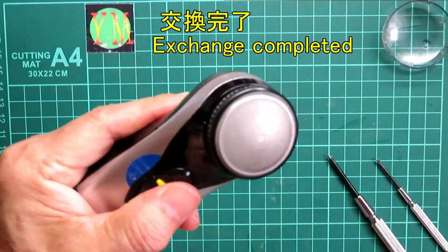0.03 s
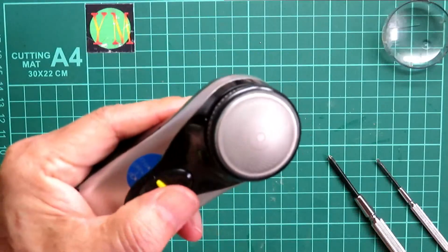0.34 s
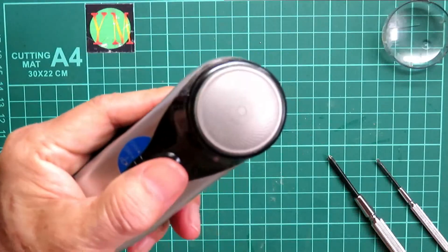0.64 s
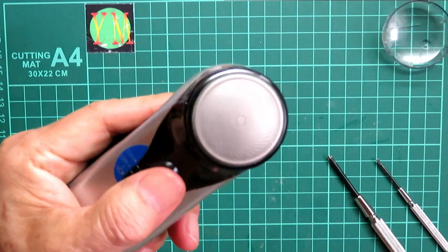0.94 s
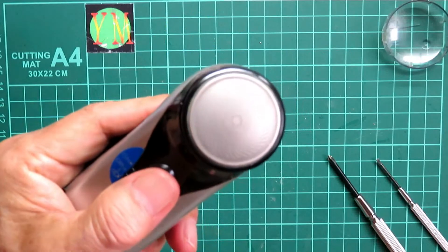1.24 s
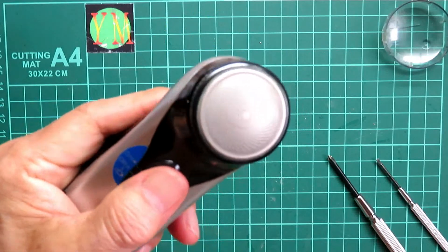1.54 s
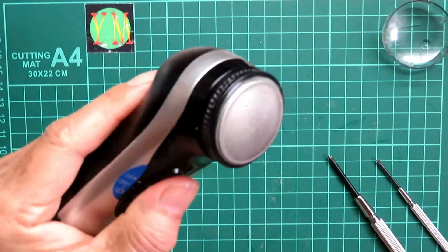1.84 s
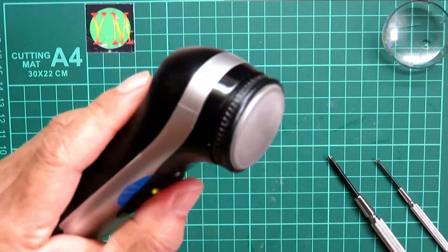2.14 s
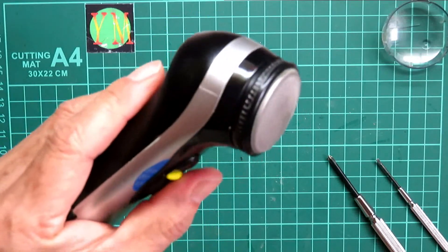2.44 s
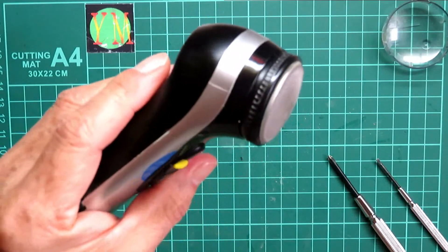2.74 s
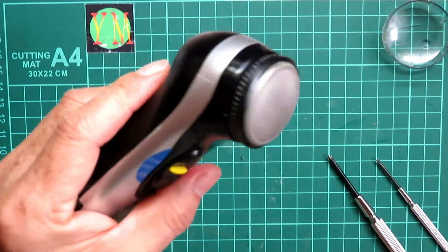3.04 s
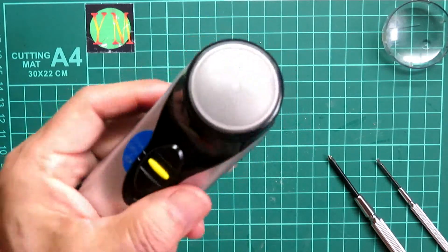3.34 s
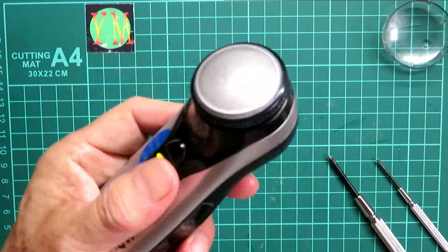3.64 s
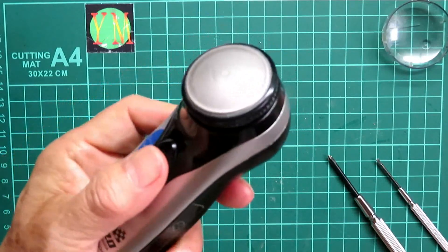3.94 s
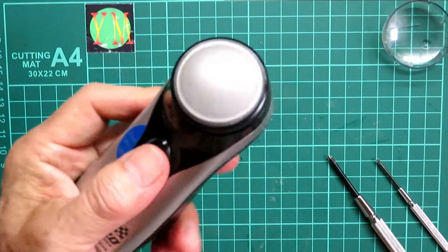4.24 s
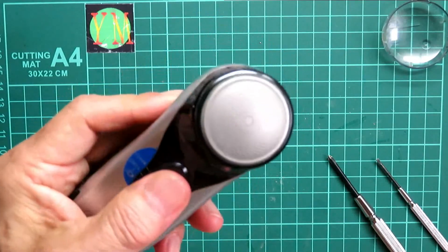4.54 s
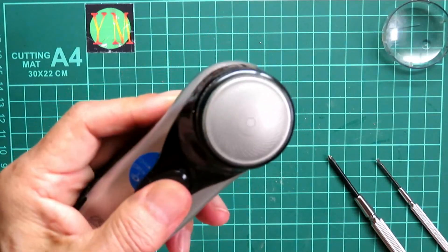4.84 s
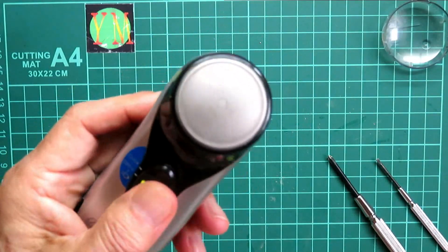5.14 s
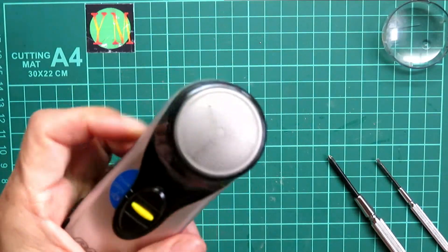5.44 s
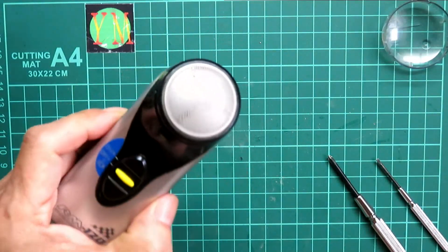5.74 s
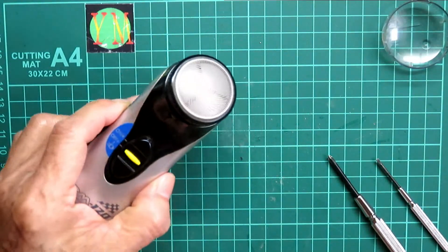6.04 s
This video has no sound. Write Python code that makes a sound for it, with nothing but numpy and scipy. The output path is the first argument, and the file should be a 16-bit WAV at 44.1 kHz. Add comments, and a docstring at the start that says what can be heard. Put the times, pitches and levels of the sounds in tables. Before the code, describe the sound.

The raspy, whining buzz of a handheld electric shaver cuts off and coasts to a halt, leaving faint finger taps in a quiet room.

```python
"""A small rotary shaver runs in the hand over a desk. Its loose cutter rattles the plastic housing and
scrapes past the slots of the foil, nearly alike on every turn, so the sound gathers at harmonics of the
rotation rate. The gears sing, blades squeal, and the rasp grows while the hand turns the head aside.
At 4.85 s the power is cut: friction brakes the cutter, the pitch falls, the blades catch, and it halts
with a knock. Afterwards the fingers shift on the case in a quiet room."""
import sys
import numpy as np
from scipy import signal
from scipy.fft import rfft, irfft, next_fast_len
from scipy.io import wavfile
from scipy.ndimage import uniform_filter1d, map_coordinates

SR = 44100
rng = np.random.default_rng(int(sys.argv[2]) if len(sys.argv) > 2 else 0)


def store_pcm(level_fs):
    """Save levels as 16-bit WAV."""
    pcm = np.round(np.clip(level_fs, -1, 1) * 32767).astype(np.int16)
    wavfile.write(sys.argv[1], SR, np.atleast_2d(pcm).T)


N = 276989
TIME = np.arange(N) / SR
OFF_S, HALT_S = 4.848, 5.312  # the power is cut; the cutter stands still
COAST_FADE_S = .13  # after the cut, the gear tones die and the foil's ring drops over this time
SLOTS, STEPS = 40, 2048  # per turn: slots passed, samples of a roughness pattern

# Levels are relative. Harmonic numbers are multiples of the rotation rate.
# rotation rate of the cutter under power: t/s, f/Hz
ROTATION = [(0.0, 62.07), (0.36, 65.21), (0.54, 67.12), (0.83, 66.39), (0.97, 68.69), (1.3, 71.58),
            (1.49, 70.96), (1.58, 73.1), (2.28, 74.28), (2.43, 72.61), (2.5, 71.05), (2.72, 70.43),
            (2.79, 72.69), (3.1, 74.63), (3.48, 75.24), (3.51, 75.79), (4.16, 77.7), (4.21, 75.75),
            (4.31, 73.05), (4.84, 71.12)]
# the hand turns the head aside: t/s, tilt (0 face on, 1 side on)
HEAD_TILT = [(0, 0.015), (1.5, 0.2), (1.85, 1), (2.35, 1), (2.6, 0.9), (3.4, 0.8), (3.65, 0.14),
             (4.15, 0.15), (4.35, 0.19)]
# how hard the cutter shakes the housing: t/s, head level/dB, shell level/dB
HOUSING_SHAKE = [(0.0, -26.5, -22), (0.03, -21, -25.5), (0.13, -18, -24.5), (0.88, -17.5, -21.5),
                 (1.09, -19.5, -18.5), (2.0, -16.5, -21), (2.63, -22.5, -21.5), (2.9, -14.5, -17),
                 (2.93, -20.5, -23), (3.01, -18.5, -22), (3.61, -16.5, -17), (3.73, -19.5, -19.5),
                 (4.3, -21.5, -19), (4.39, -16.5, -20), (4.7, -26.5, -18), (4.85, -26, -18.5)]
# boom of the cavity, and buzz of the flank where the hand leaves it bare: t/s, level/dB
CAVITY_LEVEL = [(0.0, -38), (0.55, -29.5), (0.58, -31.5), (1.21, -28), (3.08, -30.5), (3.69, -24.5),
                (3.86, -28), (4.42, -28.5), (4.55, -32.5), (4.85, -33.5)]
FLANK_LEVEL = [(1.6, -49), (1.9, -33), (2.6, -28), (3, -30), (3.3, -53), (4.25, -43), (4.65, -30.5),
               (4.86, -31)]
# frequency responses of the four parts of the housing: f/Hz, level/dB
CAVITY_RESPONSE = [(200, -32.5), (380, -22.5), (450, -15), (540, -23), (610, -21.5), (670, -7.5),
                   (780, -0.5), (880, 5.5), (960, 4), (1030, -3.5), (1120, -5), (1400, -21.5), (2000, -28)]
HEAD_RESPONSE = [(1000, -58), (1350, -17), (1500, -17), (1620, -2.5), (1720, 2), (1800, -1), (1920, -4),
                 (2080, -7), (2400, -31.5), (3500, -34)]
SHELL_RESPONSE = [(1600, -50.5), (2100, -18), (2280, 0), (2450, 0), (2650, 2.5), (2900, -1), (3100, -8.5),
                  (3400, -8.5), (3900, -10.5), (4600, -12), (7000, -15)]
FLANK_RESPONSE = [(400, -31), (610, -11.5), (900, -8.5), (1100, 0.5), (1300, -4.5), (1470, 3.5),
                  (1680, -17.5), (2000, 3.5), (2300, -9), (4000, -46.5)]
# spectral envelopes of the foil's rasp, sizzle, squeals and catches: f/Hz, level/dB
RASP_RESPONSE = [(500, -47), (2000, -16), (3200, -3), (3750, .5), (4450, -9), (5000, -3), (5500, 0),
                 (7000, -5), (9000, -20), (15800, -29)]
SIZZLE_RESPONSE = [(500, -40), (3000, -22), (4500, -3.5), (5600, 4.5), (7000, 1.5), (8400, 2), (9400, 5.5),
                   (10500, 2), (11500, 1.5), (12500, 1), (14000, -0.5), (15800, -2)]
SQUEAL_RESPONSE = [(500, -37), (1300, -16), (1750, 0), (2300, -1), (3300, -8), (4500, 2), (5800, 6),
                   (7000, -1.5), (8300, 1), (10500, 0), (12800, 7.5), (14800, 3), (16000, -14)]
CATCH_RESPONSE = [(500, -30), (3000, -12), (4500, 2.5), (6500, 4.5), (8800, 8), (11000, 0), (14000, -4.5),
                  (15800, -8)]
# three resonances of the foil, shifting as the hand turns the head: t/s, f/Hz, level/dB
FOIL_LOW_MODE = [(0.0, 4900, -24), (0.24, 5600, -29), (0.53, 5420, -26.5), (1.58, 5540, -32.5),
                 (1.84, 5760, -28.5), (2.7, 5580, -25), (3.15, 5850, -30.5), (3.34, 5630, -27),
                 (3.67, 5740, -37), (3.94, 5730, -31), (4.75, 5160, -33.5), (4.85, 5280, -30)]
FOIL_MID_MODE = [(0.0, 8460, -30), (0.22, 8000, -21), (0.35, 8400, -28), (0.67, 8200, -24),
                 (1.57, 9060, -26.5), (1.81, 8550, -40), (2.26, 8960, -31), (2.59, 8360, -25),
                 (3.07, 8780, -23.5), (3.27, 9400, -31), (3.39, 8800, -36), (3.84, 9630, -28),
                 (4.27, 8930, -25.5), (4.85, 8300, -29)]
FOIL_TOP_MODE = [(0.0, 14000, -26), (0.16, 13100, -27), (0.92, 13600, -29.5), (0.96, 13700, -24),
                 (1.08, 13800, -27), (1.62, 13960, -28), (2.21, 13800, -37), (3.48, 14300, -30),
                 (3.61, 13500, -32), (3.89, 13200, -27), (4.21, 13200, -28), (4.28, 14400, -27),
                 (4.78, 13950, -26), (4.85, 13960, -23)]
# the foil's share in the stereo side signal: f/Hz, level/dB
SIDE_RESPONSE = [(700, 11), (1400, -30), (2600, -52), (4200, -35), (5200, -8), (6800, -24), (8100, -5),
                 (12000, 0.5), (15000, -4.5)]
# brief squeals of a blade: start t/s, end t/s, centre harmonic, width/harmonics, level/dB
BLADE_SQUEALS = [(0.099, 0.42, 126, 5, -34), (0.15, 0.913, 121, 2, -27.5), (.1, 0.94, 156, 8, -35),
                 (0.417, 0.97, 81, 1, -37), (0.851, 1.06, 124, 5, -30), (0.86, 1.4, 157, 10, -40),
                 (1.0, 1.55, 77, 5, -38), (0.96, 1, 202, 8, -31), (1.02, 1.54, 129, 2, -33.5),
                 (1.682, 2.2, 82, 2, -35), (2.25, 3, 157, 14, -34), (2.594, 3, 120, 4, -33),
                 (3.1, 3.2, 162, 6, -34), (3.03, 3.6, 82, 1, -40), (3.0, 3.45, 79, 3, -34),
                 (3.5, 4.2, 79, 2, -37.5), (3.401, 4.6, 61, 1, -43), (3.8, 4, 57, 1, -39.5),
                 (3.65, 4.25, 159, 8, -39), (3.6, 4.25, 171, 12, -38), (3.7, 4.9, 113, 6, -37),
                 (4.232, 4.5, 120, 5, -33), (4.96, 5.05, 120, 8, -33), (5.238, 5.28, 245, 10, -25)]
# lasting tones of the gears: harmonic, level/dB
GEAR_HARMONICS = [(9, -45), (10, -46), (11, -47.5), (12, -40), (15, -46), (23, -36.5), (24, -41), (26, -47),
                  (36, -38.5), (40, -40)]
# gear tones that swell as the grip shifts: start t/s, end t/s, harmonic, level/dB
GEAR_SWELLS = [(0, 0.797, 14, -35.5), (0.096, 0.9, 26, -24), (0.706, 1.045, 28, -23),
               (1.155, 2.343, 11, -38), (1.152, 2, 23, -28.5), (1.15, 1.552, 40, -37),
               (1.2, 2.447, 36, -32), (1.852, 2.375, 22, -27), (2.954, 3.435, 22, -24.5),
               (3.001, 3.506, 32, -33.5), (3.2, 3.888, 10, -35), (3.299, 4.553, 23, -26.5),
               (3.3, 4.45, 11, -40.5), (3.7, 4.35, 37, -33.5), (3.397, 4.2, 6, -56), (3.904, 4.94, 9, -41),
               (4.25, 4.792, 40, -31.5), (4.251, 4.6, 38, -28)]
# the cutter strikes the head, catches on the foil, and gives a last knock: t/s, level/dB
HEAD_STRIKES = [(0.622, -13), (1.327, -14), (1.674, -9), (1.702, -6), (1.799, -7), (1.84, -12),
                (1.854, -15), (1.88, -16), (3.019, -7), (3.034, -4), (3.102, -11), (3.406, -15),
                (3.459, -4), (3.589, -12), (4.364, -9), (4.392, -5.5), (4.406, -11.5), (4.435, -7),
                (4.943, -23), (5.065, -27.5), (5.14, -20), (5.154, -21), (5.181, -20.5)]
BLADE_CATCHES = [(5.0673, -8), (5.0994, -5.5), (5.127, -9), (5.1424, -16), (5.1665, -6), (5.1824, -20),
                 (5.2229, -10), (5.254, -6)]
LAST_KNOCK = [(5.302, -27)]
# fingers on the case: t/s, push level/dB, snap level/dB
FINGER_TOUCHES = [(5.8255, -36, -27), (5.8305, -28.5, -31), (6.012, -35.5, -52), (6.025, -45, -55),
                  (6.059, -41, -55)]
# modes rung by a strike, the last knock, a finger's push and its snap: f/Hz, level/dB, T60/s
STRIKE_MODES = [(1705, 0, 0.031), (1800, -12, 0.018), (2670, -16, 0.018)]
LAST_KNOCK_MODES = [(906, 5.5, 0.044), (949, -19, 0.05), (1720, -2, 0.067), (2260, -4, 0.024)]
PUSH_MODES = [(112.6, 2.5, 0.22), (276, -1.5, 0.091), (325, 3, 0.058), (406, -5, 0.067)]
PLASTIC_MODES = [(1130, 1, .012), (1490, -1, 0.011), (6500, -8, .008), (9200, -8, .009), (13800, -14, .008)]
# spectral density of the room noise: f/Hz, level/dB
ROOM_SPECTRUM = [(10, -28), (24, -9), (32, -8.5), (42, -4), (52, -3.5), (62, -9.5), (90, -10), (125, -12),
                 (200, -16), (400, -17), (630, -20), (2700, -27), (7300, -37), (15500, -51)]
# likeness of the room noise in left and right: f/Hz, correlation
ROOM_CORRELATION = [(60, 1), (130, 0.89), (290, 0.01), (1400, 0.44), (15000, 0.32)]


def cutter_speed(judder=.04):
    """Uniform deceleration: the motor holds the rate (Hz) until friction brakes it, with a judder."""
    remaining = np.clip((HALT_S - TIME) / (HALT_S - OFF_S), 0, 1)
    unevenness = 1 + judder * np.sqrt(1 - remaining) * wander(N, size=120)
    return curves(ROTATION)[0] * remaining * unevenness


def rattle(turns, spread_db=.5, jitter_turns=.14, contact_s=.0012):
    """Impact excitation: the loose cutter knocks twice a turn, unevenly, each a decaying noise burst."""
    beats = np.arange(1, int(turns[-1] * 2)) / 2
    late, weak = rng.standard_normal((len(beats), 2)).T
    knocks = impulses(np.interp(beats + jitter_turns * late, turns, TIME), -spread_db * np.tanh(weak))
    envelope = signal.lfilter([1], [1, -np.exp(-1 / (contact_s * SR))], knocks)
    return envelope * rng.standard_normal(N)


def housing(turns, knocks, slack_db=-4, slack_s=.058, coast_db_per_s=-24):
    """Forced vibration: gear buzz, knocks and loose grit drive the cavity, head, shell and flank."""
    buzz = steady(spin(roughness(turns, drift_rad=.16, uneven_db=5.5), turns))
    grit = unit(rng.standard_normal(N) * (1 + .36 * np.cos(2 * np.pi * turns)))
    head_db, shell_db = curves(HOUSING_SHAKE)
    cavity_db, flank_db = curves(CAVITY_LEVEL)[0], curves(FLANK_LEVEL)[0]
    cavity = amp(cavity_db - 1.37) * steady(colour(buzz + .89 * knocks + .5 * grit, CAVITY_RESPONSE))
    head = amp(head_db - 1) * steady(colour(buzz + 1.04 * knocks + .71 * grit, HEAD_RESPONSE))
    shell = amp(shell_db - 2.02) * steady(colour(buzz + .65 * knocks + .68 * grit, SHELL_RESPONSE))
    flank = amp(flank_db) * steady(colour(buzz + .5 * knocks + .5 * grit, FLANK_RESPONSE))
    # without power the gears go slack at once, then fade
    coast_s = np.maximum(TIME - OFF_S, 0)
    slack = amp(slack_db * np.minimum(coast_s / slack_s, 1) + coast_db_per_s * coast_s)
    moving = np.clip((HALT_S - TIME) / .0067, 0, 1)
    return moving * slack * (cavity + head + shell + flank)


def foil(turns, speed, knocks, ring_db, squeal_db, stall_hz=7.4):
    """Friction excitation: blades scrape the slotted foil; the rasp radiates from the head's side."""
    tilt, = curves(HEAD_TILT)
    coasting = np.clip((TIME - OFF_S) / COAST_FADE_S, 0, 1)
    scrape = steady(spin(roughness(turns, drift_rad=.4, uneven_db=5), turns, slot_emphasis))
    hiss = rng.standard_normal(N)
    grain_db = 2 * unit(uniform_filter1d(rng.standard_normal(N), size=30))
    drive = scrape + .33 * unit(hiss * amp(grain_db))
    chatter = .7 * tilt * knocks
    rasp = amp(-35 + 7 * tilt) * steady(colour(drive + chatter, RASP_RESPONSE))
    sizzle = amp(-28 + 4.5 * tilt) * steady(colour(drive, SIZZLE_RESPONSE))
    rings = (amp(-3) * foil_resonance(drive + chatter, FOIL_LOW_MODE, width_hz=1000)
             + amp(-3) * foil_resonance(drive, FOIL_MID_MODE, width_hz=1100)
             + amp(-2) * foil_resonance(drive, FOIL_TOP_MODE, width_hz=1700))
    scraping = beamed(rasp + sizzle + amp(ring_db - 9 * coasting) * rings)
    radiated = scraping + amp(squeal_db) * squeals(turns) + run_down(turns, speed)
    pressure = 1 + .071 * np.cos(8 * np.pi * turns)  # the blades press unevenly around the circle
    return radiated * pressure * (1 - np.exp(-speed / stall_hz))


def blade_emphasis(harmonic, depth_db=4.5):
    """Rotational symmetry: the blades favour every third harmonic."""
    return amp(depth_db * np.cos(2 * np.pi * (harmonic - 1) / 3))


def slot_emphasis(harmonic, depth_db=1):
    """Spatial periodicity: the slots favour multiples of their number, on top of the blades' emphasis."""
    return amp(depth_db * np.cos(2 * np.pi * harmonic / SLOTS)) * blade_emphasis(harmonic)


def foil_resonance(drive, mode, width_hz):
    """Resonance: a mode of the foil selects a steep-sided band around its moving centre frequency."""
    hz, db = curves(mode)
    carrier = np.exp(2j * np.pi * np.cumsum(hz) / SR)
    pole = np.exp(-np.pi * width_hz / SR)
    baseband = signal.lfilter([(1 - pole) ** 2], [1, -2 * pole, pole ** 2], drive / carrier)
    return amp(db) * steady((carrier * baseband).real)


def beamed(x, depth_db=5.2):
    """Directivity: the metal head beams narrow bands past the microphone, at random as the hand moves."""
    spectra = signal.stft(x, nperseg=512, noverlap=384)[2]
    beams = unit(uniform_filter1d(wander(spectra.T.shape, size=120), size=2, axis=1)).T
    gain = amp(depth_db * np.clip(beams - .15, -2.5, 1.3))
    return signal.istft(spectra * gain, nperseg=512, noverlap=384)[1][:N]


def squeals(turns, drift_rad=.0048):
    """Friction-induced vibration: a blade squeals on the slots; phase drift roughens higher squeals."""
    clusters = sum(amp(db) * flare(turns, start, end, centre, width, drift_rad * centre, neighbours=9)
                   for start, end, centre, width, db in BLADE_SQUEALS)
    return colour(clusters, SQUEAL_RESPONSE)


def gears(turns, speed, drift_rad=.0005, flutter_db=4, db_per_hz=.4, usual_hz=72.8):
    """Modulated meshing tones: cutter wobble flutters them; play in the teeth roughens the higher ones."""
    tones = sum(amp(db) * cluster(turns, k, 1, drift_rad * k ** 2) for k, db in GEAR_HARMONICS)
    swells = sum(amp(db + 2) * flare(turns, start, end, k, 1, drift_rad * k ** 2)
                 for start, end, k, db in GEAR_SWELLS)
    powered = np.clip(1 - (TIME - OFF_S) / COAST_FADE_S, 0, 1)
    level_db = db_per_hz * (speed - usual_hz) + flutter_db * np.tanh(wander(N, size=700))
    return (tones + swells) * powered * amp(level_db)


def run_down(turns, speed, level_db=-33, flicker_db=4, rough_rad=.8, low_hz=3300, top_hz=15000):
    """Slot-passing frequency: as the cutter coasts, its overtones fall through the foil's range."""
    coasting, out = (TIME > OFF_S) & (TIME < HALT_S), np.zeros(N)
    for harmonic in SLOTS * np.arange(2, 18):
        hz = harmonic * speed[coasting]
        in_band = np.clip(np.minimum(hz - low_hz, top_hz - hz) / 600, 0, 1)
        gain = in_band * amp(level_db + flicker_db * np.tanh(wander(len(hz), size=700)))
        phase = 2 * np.pi * harmonic * turns[coasting] + rough_rad * wander(len(hz), size=120)
        out[coasting] += gain * np.cos(phase)
    return out


def clacks(cut_hz=1300):
    """Free vibration: the cutter strikes the head, too small to radiate bass, and stops with a knock."""
    highpass = signal.butter(4, cut_hz, "high", fs=SR, output="sos")
    strikes = signal.sosfilt(highpass, ring(impulses(*np.transpose(HEAD_STRIKES)), STRIKE_MODES))
    return strikes + ring(impulses(*np.transpose(LAST_KNOCK)), LAST_KNOCK_MODES)


def catches(rise_s=.0047, ring_hz=8600, width_hz=1800):
    """Sliding friction: the slowing blades rasp at each catch, and the foil rings at its own pitch."""
    age = TIME[:SR // 20] / rise_s
    bursts = signal.oaconvolve(impulses(*np.transpose(BLADE_CATCHES)), age * np.exp(1 - age))[:N]
    rasps = amp(-16) * bursts * unit(colour(rng.standard_normal(N), CATCH_RESPONSE))
    resonator = signal.iirpeak(ring_hz, ring_hz / width_hz, fs=SR)
    ringing = unit(signal.lfilter(*resonator, rng.standard_normal(N)))
    return rasps + amp(-31) * gate(5.14, 5.26, fade_s=.15) * ringing


def fingers():
    """Impulse response: each touch rings the case with a dull push and a small plastic snap."""
    times, push_db, snap_db = np.transpose(FINGER_TOUCHES)
    return ring(impulses(times, push_db), PUSH_MODES) + ring(impulses(times, snap_db), PLASTIC_MODES)


def room(noise_db=-39.5, hum_hz=51, hum_db=-49):
    """Partial coherence: rumble alike in both channels and a less alike soft hiss, with a faint hum."""
    hz = np.fft.rfftfreq(N, 1 / SR)
    left, independent = rfft(rng.standard_normal((2, N)))
    correlation = at_frequency(ROOM_CORRELATION, hz)
    right = correlation * left + np.sqrt(1 - correlation ** 2) * independent
    air = irfft(np.array([left, right]) * amp(at_frequency(ROOM_SPECTRUM, hz)), N)
    return amp(noise_db) * unit(air) + amp(hum_db) * np.sin(2 * np.pi * hum_hz * TIME)


def roughness(turns, drift_rad, uneven_db):
    """Quasi-periodicity: the roughness around the circle recurs, its harmonics drifting turn by turn."""
    shape = (int(turns[-1]) + 2, STEPS // 2 + 1)
    phase = drifting_phase(shape, drift_rad)
    strength = np.tanh(wander(shape, size=30))
    return irfft(amp(uneven_db * strength) * np.exp(1j * phase), axis=1).ravel()


def spin(pattern, turns, weight=np.ones_like):
    """Pitch follows rotation: the pattern, its harmonics weighted, is read at the cutter's angle."""
    size = next_fast_len(len(pattern))
    shaped = irfft(rfft(pattern, size) * weight(np.fft.rfftfreq(size, 1 / STEPS)), size)
    fine_turns = np.interp(np.arange(3 * N) / 3, np.arange(N), turns)  # oversampled against aliasing
    return signal.resample_poly(map_coordinates(shaped, [fine_turns * STEPS], order=1), 1, 3)


def cluster(turns, centre, width, drift_rad, neighbours=0, trade_db=5):
    """Fourier synthesis: a harmonic and its neighbours trade strength under a bell curve, at rms 1."""
    offsets = np.arange(-neighbours, neighbours + 1)
    harmonics = round(centre) + offsets
    shape = (int(turns[-1]) + 3, len(harmonics))
    bell = 1 / (1 + (2 * offsets / width) ** 2)
    weights = bell * blade_emphasis(harmonics) * amp(trade_db * wander(shape, size=14))
    weights /= np.linalg.norm(weights, axis=1, keepdims=True)
    spectra = np.zeros((shape[0], STEPS // 2 + 1), complex)
    spectra[:, harmonics] = weights * np.exp(1j * drifting_phase(shape, drift_rad))
    cycles, blend = irfft(spectra, axis=1), np.arange(STEPS) / STEPS
    pattern = (cycles[:-1] * (1 - blend) + cycles[1:] * blend).ravel()  # each turn fades into the next
    return unit(np.interp(turns * STEPS, np.arange(len(pattern)), pattern))


def flare(turns, start, end, centre, width, drift_rad, neighbours=0):
    """Amplitude envelope: a cluster of harmonics sounds for a limited time."""
    envelope = gate(start, end, fade_s=min(.11, (end - start) / 3))
    on, out = envelope > 0, np.zeros(N)
    out[on] = envelope[on] * cluster(turns[on] - turns[on][0], centre, width, drift_rad, neighbours)
    return out


def drifting_phase(shape, drift_rad):
    """Random walk: each harmonic (column) takes one phase step per turn (row)."""
    return 2 * np.pi * rng.random(shape[1]) + drift_rad * np.cumsum(rng.standard_normal(shape), 0)


def wander(shape, size):
    """Low-pass noise: random values of rms 1 that change over size rows."""
    smoothed = uniform_filter1d(rng.standard_normal(shape), size, 0, mode="wrap")
    return unit(uniform_filter1d(smoothed, size, 0, mode="wrap"))


def ring(x, modes):
    """Modal superposition: every impulse starts a sum of damped sinusoids."""
    t = TIME[:SR // 4]
    response = sum(amp(db - 60 * t / t60) * np.sin(2 * np.pi * hz * t) for hz, db, t60 in modes)
    return signal.oaconvolve(x, response)[:N]


def colour(x, response, size=8192):
    """Minimum-phase filtering: a causal filter with the given magnitude response."""
    log_gain = np.log(amp(at_frequency(response, abs(np.fft.fftfreq(size, 1 / SR)))))
    taps = np.fft.ifft(np.exp(np.conj(signal.hilbert(log_gain)))).real[:size // 2]
    return signal.oaconvolve(x, taps)[:N]


def impulses(times, db):
    """Ideal impacts: one sample at each given time."""
    return np.bincount(np.round(times * SR).astype(int), amp(db), N)[:N]


def gate(start, end, fade_s):
    """Trapezoidal window: linear fades centred on start and end."""
    return np.clip(np.minimum(TIME - start, end - TIME) / fade_s + .5, 0, 1)


def curves(rows):
    """Linear interpolation of a table's columns over time."""
    times, *columns = np.transpose(rows)
    return [np.interp(TIME, times, column) for column in columns]


def at_frequency(points, hz):
    """Interpolation of a spectrum on a logarithmic frequency axis."""
    f, value = np.transpose(points)
    return np.interp(np.log(hz + 1), np.log(f + 1), value)


def steady(x, size=6000):
    """Normalisation of the running rms to 1."""
    return x / np.sqrt(abs(uniform_filter1d(x ** 2, size)) + 1e-4 * np.mean(x ** 2))


def unit(x):
    """Normalisation of the overall rms to 1."""
    return x / np.sqrt(np.mean(x ** 2) + 1e-20)


def amp(db):
    """Amplitude ratio of a level in decibels."""
    return 10 ** (np.asarray(db) / 20)


def scene():
    """Superposition: one rotation drives housing, gears and foil; contacts and the room add to them."""
    speed = cutter_speed()
    turns = np.cumsum(speed) / SR
    knocks = steady(rattle(turns), size=16000)
    shaver = housing(turns, knocks) + gears(turns, speed)
    shaver += foil(turns, speed, knocks, ring_db=-1, squeal_db=0) + catches()
    mid = shaver + clacks() + fingers()
    # each microphone faces other slots of the foil
    other_slots = foil(turns, speed, knocks=0, ring_db=-5.5, squeal_db=-4) + catches()
    side = colour(other_slots, SIDE_RESPONSE)
    return np.array([mid + side, mid - side]) + room()


def record(dry, knee=.7, headroom=.2, edge_hz=15850):
    """Soft saturation rounds off the highest peaks; a low-pass filter then limits the band."""
    held = np.clip(dry, -knee, knee)
    rounded = held + headroom * np.tanh((dry - held) / headroom)
    lowpass = signal.firwin(801, edge_hz, window=("kaiser", 9), fs=SR)
    return signal.oaconvolve(rounded, lowpass[None], "same")


dry = scene()
out = record(dry)
store_pcm(out)
```